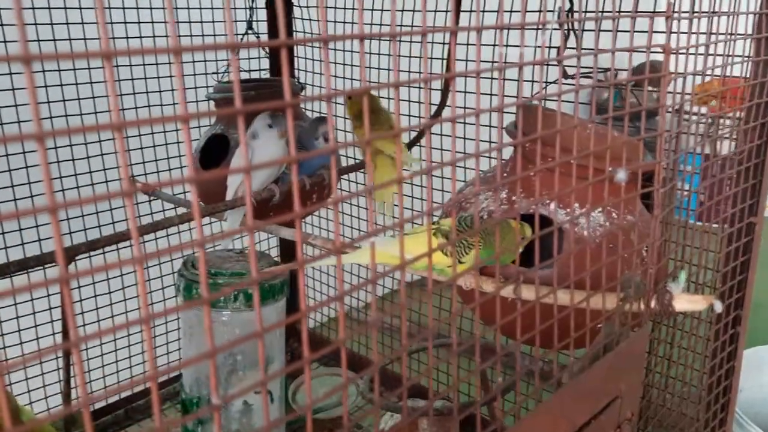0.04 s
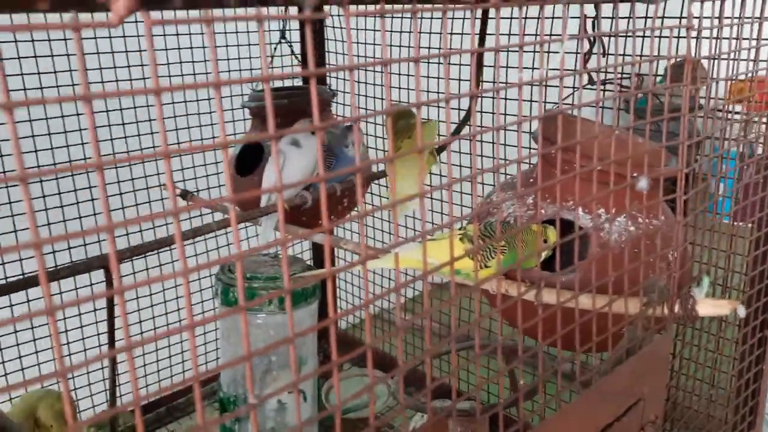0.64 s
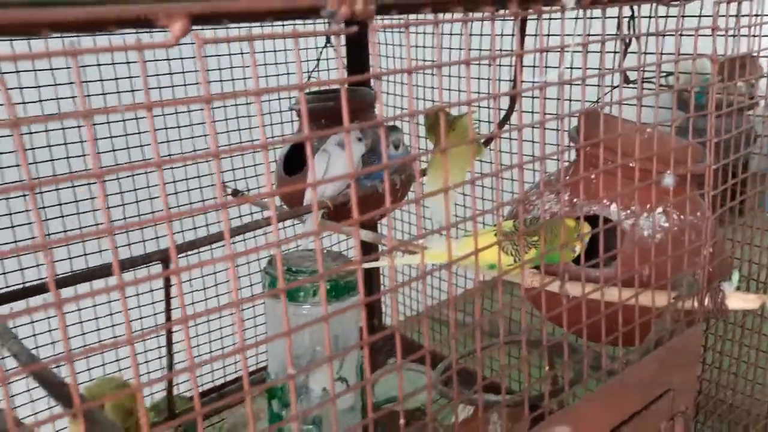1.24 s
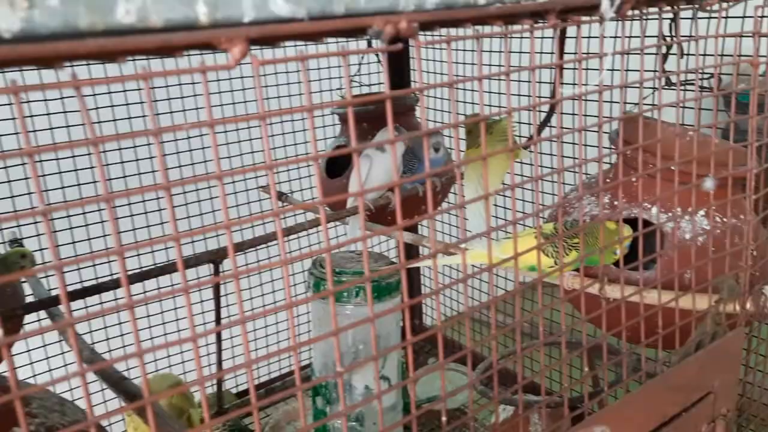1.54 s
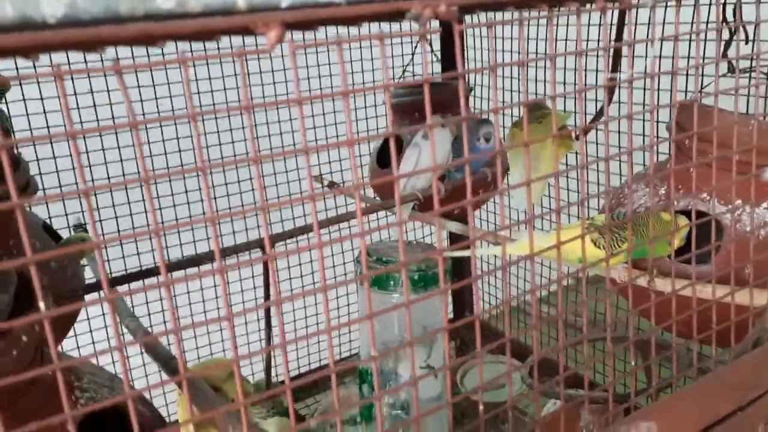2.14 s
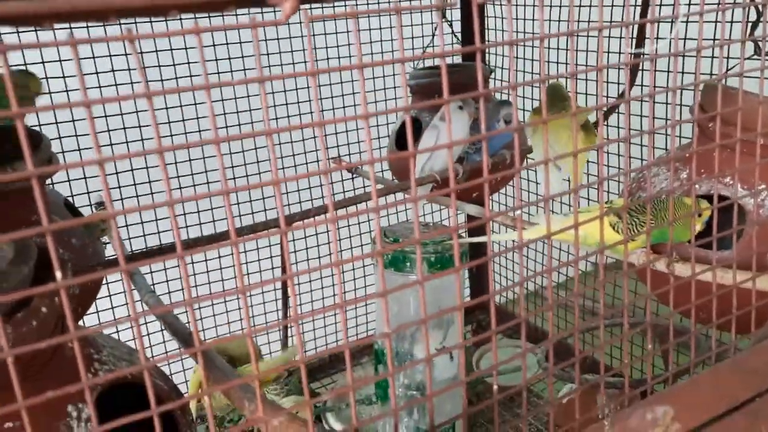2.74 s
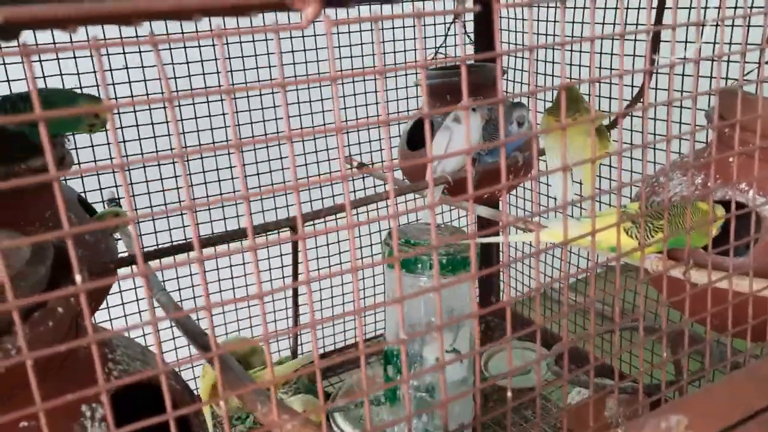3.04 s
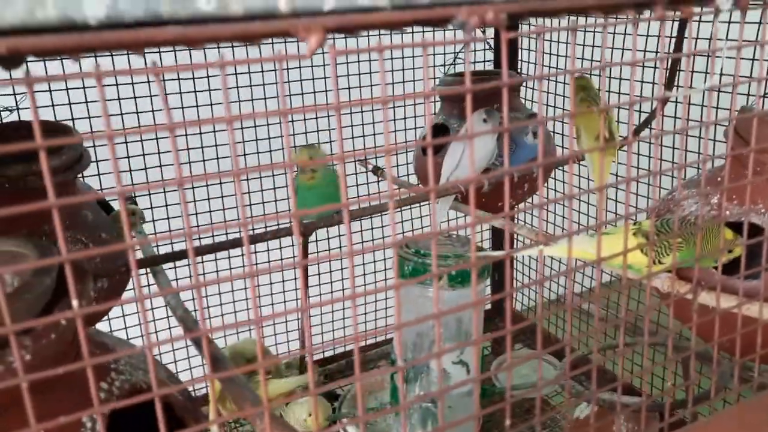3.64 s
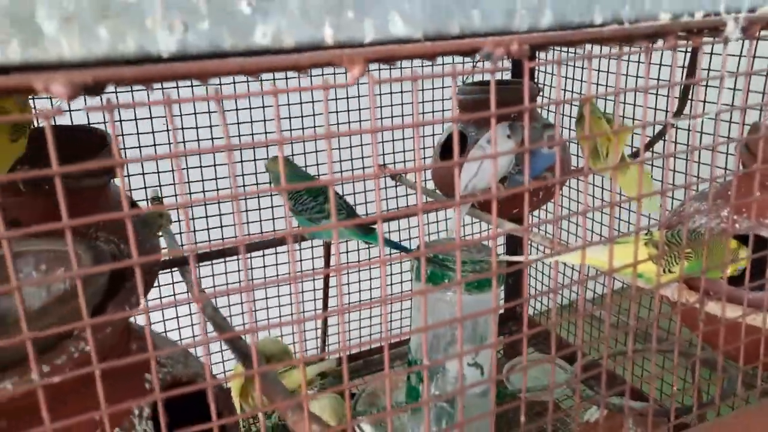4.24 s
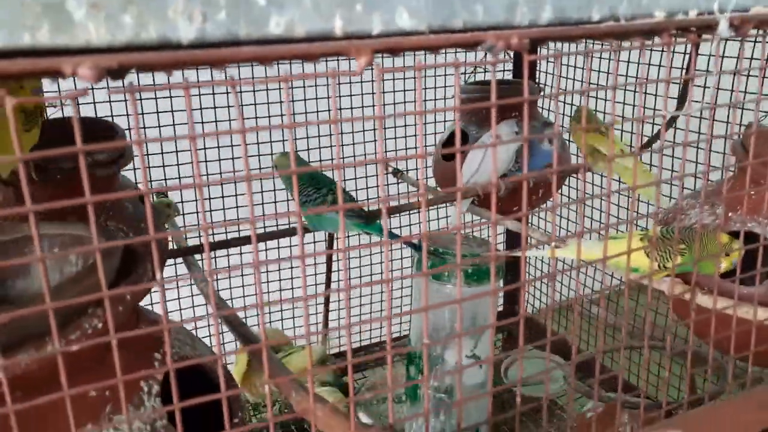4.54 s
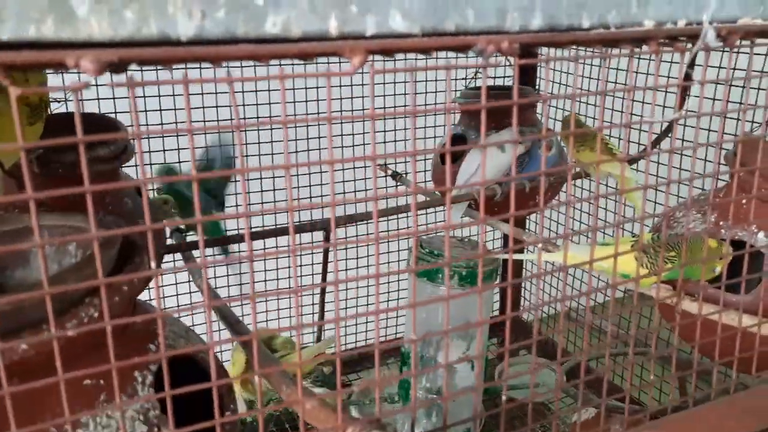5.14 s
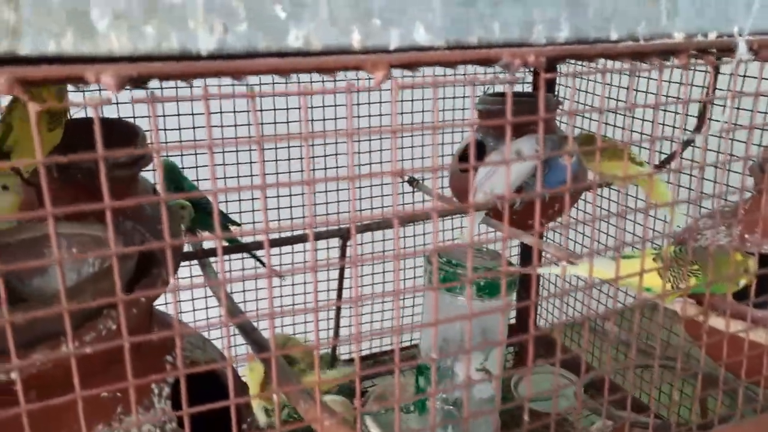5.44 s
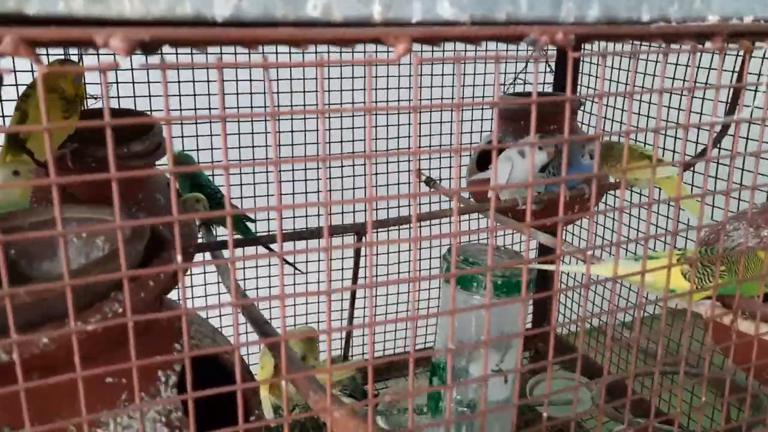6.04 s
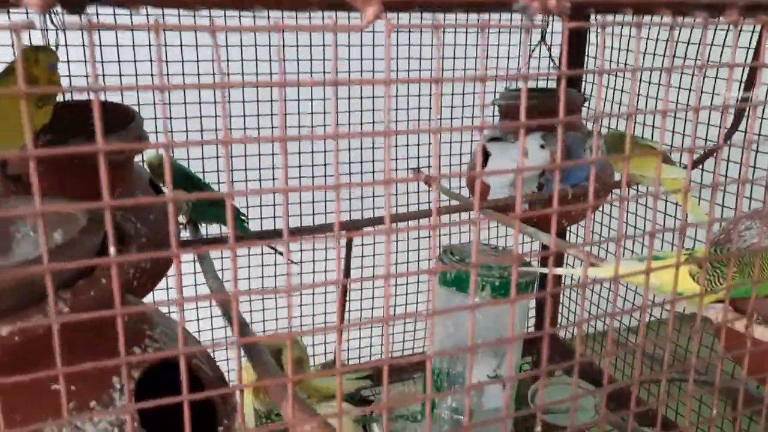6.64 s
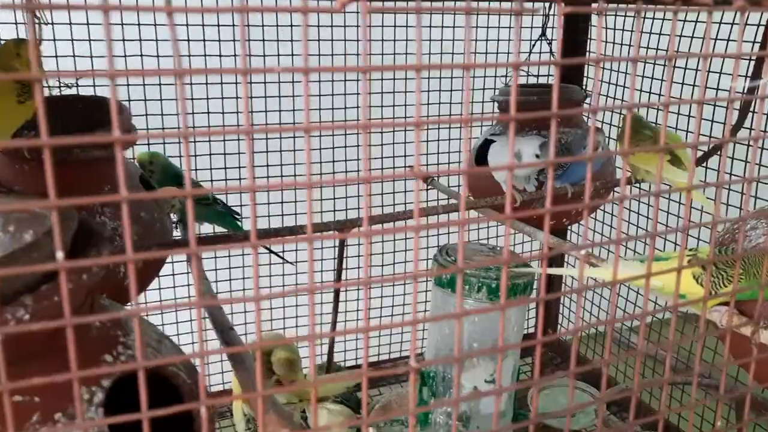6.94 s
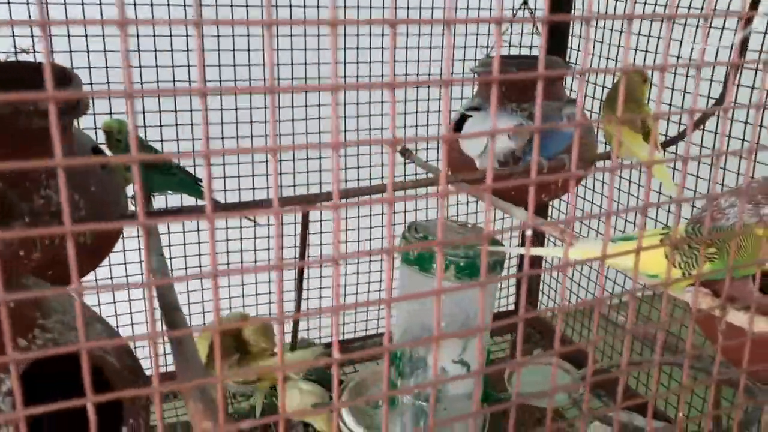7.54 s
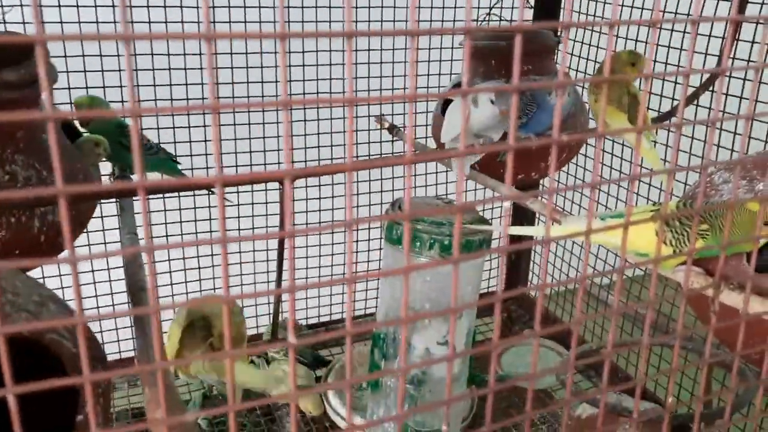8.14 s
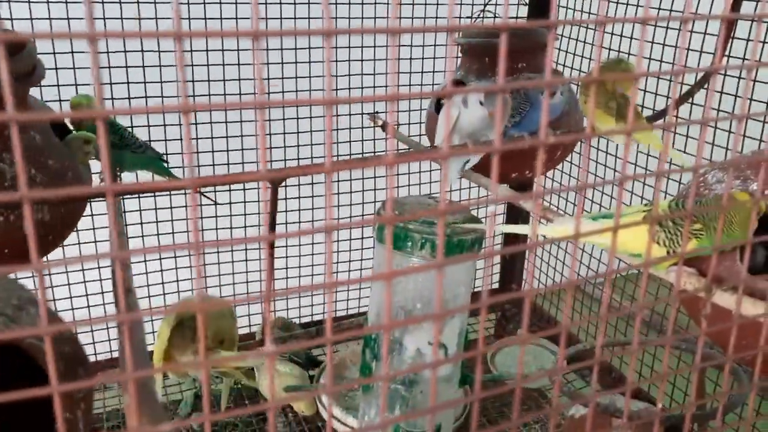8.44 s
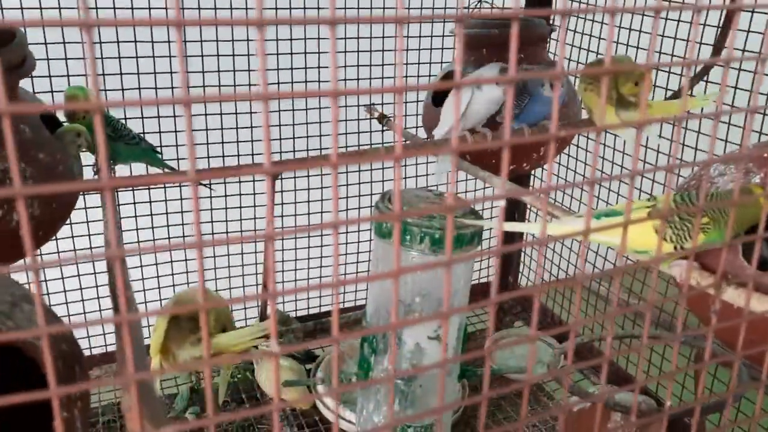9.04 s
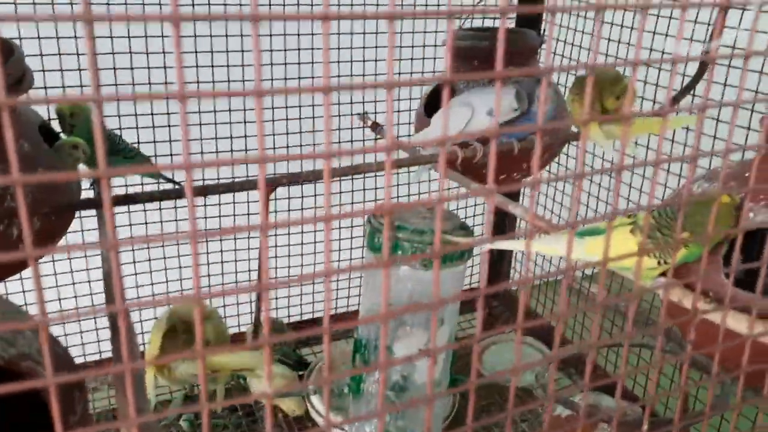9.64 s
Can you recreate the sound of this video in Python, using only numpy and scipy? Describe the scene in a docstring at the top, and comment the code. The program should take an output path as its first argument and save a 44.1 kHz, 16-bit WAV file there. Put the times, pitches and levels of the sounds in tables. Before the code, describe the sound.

Budgerigars chatter close to the microphone in a wire cage on a porch. Quick high chirps, some clear and some hoarse, mix with squawks and short buzzing rasps, while more birds twitter further back. Wings and claws rustle faintly twice, and the loudest rasp comes about three quarters of the way through. Distant traffic rumbles underneath the whole time.

```python
"""Budgerigars warble in a wire cage on a porch, close to a phone with two spaced microphones.
From the start, distant traffic rumbles and drones under quick syrinx glides, clear or hoarse, and the
chatter of birds further off. From 0.3 s buzzing rasps, puffs that ring the throat, join the glides.
Wings and claws rustle softly at 2.5 s and briefly at 7 s; the loudest rasp follows at 7.4 s.
The song runs to the end, thrown back by the cage floor and nearby walls."""
import sys
import numpy as np
from scipy import signal
from scipy.fft import rfft, irfft, next_fast_len
from scipy.io import wavfile

SR = 44100
rng = np.random.default_rng(int(sys.argv[2]) if len(sys.argv) > 2 else 0)


def wrap_up_sound(samples):
    """Save the sound to the file named by the first command line argument, as 16-bit audio."""
    columns = np.atleast_2d(samples).T
    # keep every value between -1 and 1, then stretch to whole-number steps
    tamed = np.clip(columns, -1, 1)
    steps = np.round(tamed * 32767).astype(np.int16)
    wavfile.write(sys.argv[1], SR, steps)


N = 431738
TIME = np.arange(N) / SR

# pan_db is left minus right throughout
# falling chirps; the 5180 Hz row is the bright overtone of the chirp at 4.06 s
# start_s, length_s, pitch_hz, level_db, hoarseness, pan_db
SLIDES = [(0.104, 0.029, 2590, -40, 0.2, -1), (0.215, 0.059, 3370, -39, 0.08, 2.5),
          (0.486, 0.038, 3050, -26, 0.17, -0.5), (0.517, 0.032, 1562, -33.5, 0.54, -6),
          (0.735, 0.041, 2013, -35, 0.38, -1.5), (0.97, 0.019, 3270, -48, 0, -23),
          (1.235, 0.03, 3074, -29, 0.4, -0.5), (1.371, .03, 2850, -26.5, 0.42, 1),
          (1.474, 0.026, 1996, -33.5, 0.4, 0), (1.426, 0.026, 3550, -29.5, 0.37, 0.5),
          (1.523, 0.026, 3590, -25, 0.35, -1.5), (1.543, .045, 2460, -27, 0.71, 1.5),
          (1.767, 0.032, 3630, -35, 0.3, 1.5), (1.864, 0.053, 1527, -37.5, 0.48, -1),
          (1.923, 0.047, 3360, -26, 0.58, 2), (2.143, 0.03, 2940, -31, 0.31, -1),
          (2.186, .029, 2140, -30, 0.43, 1.5), (2.488, 0.019, 3270, -27.5, 0.42, 5.5),
          (2.515, .049, 3097, -26.5, .65, 0.5), (2.907, 0.026, 3160, -26, 0, 2),
          (2.999, 0.018, 3690, -28.5, 0.3, 8), (3.008, .011, 6100, -19.5, 0.3, 0),
          (3.037, .043, 2293, -30, 0.1, 1), (3.177, 0.054, 2930, -25, 0.12, 2),
          (3.207, 0.041, 1550, -38.5, 0.15, 1.5), (3.321, 0.027, 5690, -28, .27, -8),
          (3.353, 0.045, 2410, -30, 0.59, 9), (3.42, 0.038, 2800, -18, 0.51, 1),
          (3.485, .023, 3280, -23.5, 0.24, -10), (3.698, 0.021, 3160, -27.5, 0.03, 0),
          (3.724, 0.037, 1750, -37, 0.65, -4.5), (3.96, .045, 1754, -36, 0.63, 1),
          (3.925, 0.03, 2700, -27.5, 0.4, 1), (4.053, .028, 5180, -36.5, 0.3, 0.5),
          (4.059, 0.03, 2650, -44, .25, 1.5), (4.309, 0.046, 3143, -29, 0.24, 0.5),
          (4.338, 0.04, 1680, -37.5, .7, -10), (4.456, 0.031, 3415, -29, 0.58, -1),
          (4.515, 0.037, 3120, -29, 0.33, 0.5), (4.614, 0.019, 3420, -29.5, 0.22, -8.5),
          (4.638, 0.052, 2220, -35.5, 0.42, 0.5), (4.833, 0.065, 3180, -34.5, 0.36, -6),
          (5.035, 0.043, 3090, -33, 0.42, 1), (5.165, 0.042, 5500, -26.5, 0.28, 2),
          (5.252, .043, 3320, -21.5, 0.46, 1), (5.355, 0.063, 2574, -40.5, 0.32, 1.5),
          (5.493, .024, 3630, -24.5, 0.42, -7), (5.839, 0.056, 2395, -41.5, 0, 4),
          (5.987, .028, 3413, -27, 0.27, -12), (6.391, 0.038, 2440, -32.5, 0.4, 2),
          (6.727, 0.044, 3066, -26, 0.47, 1), (6.756, 0.04, 2205, -31.5, 0.73, -13),
          (6.886, 0.016, 3490, -31, 0.1, 0), (7.345, 0.064, 3770, -31.5, 0.54, 7),
          (7.845, 0.067, 2805, -29.5, 0.52, 1), (8.006, 0.029, 3240, -41.5, 0.08, -16),
          (8.161, 0.084, 3150, -38.5, 0.36, -0.5), (8.23, .055, 2290, -30.5, .15, -2),
          (8.374, .025, 1860, -35, 0.42, -10), (8.461, 0.099, 2600, -35, 0.36, -0.5),
          (8.558, 0.046, 2500, -27.5, .2, -5.5), (8.866, 0.027, 3150, -24, 0.22, -8.5),
          (9.044, .008, 4075, -25.5, 0, 2.5), (9.081, 0.031, 3030, -24.5, 0.19, 1.5),
          (9.112, 0.031, 1643, -39, 0.67, -3), (9.237, 0.025, 3460, -36, 0.3, -0.5),
          (9.343, .055, 2878, -26.5, 0.38, 1.5), (9.553, .046, 3270, -25.5, 0.04, -0.5),
          (9.689, 0.026, 3530, -22, 0, -10.5), (9.717, 0.071, 2370, -28, 0.17, -1)]
# hoarse, nearly level notes: start_s, length_s, pitch_hz, level_db, pan_db
SQUAWKS = [(0.006, 0.053, 2480, -32, 2), (1.449, 0.06, 3017, -28, 1), (1.634, 0.064, 1850, -33, 1),
           (1.961, 0.041, 1887, -34, -2), (2.082, 0.054, 2716, -34, 1.5), (2.538, 0.051, 2213, -29.5, -3),
           (2.855, 0.043, 1790, -32.5, 0.5), (3.151, 0.035, 2380, -26, 2), (3.457, .039, 2600, -28, 2),
           (3.515, 0.051, 2106, -32, -9), (3.856, 0.046, 3980, -32, 2), (4.242, 0.038, 3950, -26, 2.5),
           (4.273, .029, 2120, -26.5, -4.5), (5.197, 0.054, 3180, -26, 1), (5.281, .066, 2806, -29, -7),
           (5.601, 0.063, 2770, -40, -1.5), (6.088, 0.035, 3385, -34.5, 3.5),
           (6.405, 0.073, 2010, -31, -3.5), (6.687, 0.044, 2780, -26.5, -1.5),
           (7.895, 0.023, 2350, -39, -21), (8.884, 0.0513, 3110, -33.5, -0.5),
           (9.386, 0.062, 2330, -31.5, 0.5)]
# upward leaps that level off: start_s, length_s, pitch_hz, level_db, pan_db
FLICKS = [(0.44, .032, 5100, -36, 3), (1.177, 0.024, 3254, -29.5, 2), (1.307, 0.016, 4370, -29, 2.5),
          (1.341, 0.062, 2890, -28, 1.5), (1.59, 0.043, 2830, -31, 1), (1.855, .04, 4890, -31, 7),
          (2.137, 0.026, 1940, -26, -5), (2.369, 0.013, 4160, -29.5, 9), (2.437, 0.043, 5100, -36, 8),
          (3.117, 0.021, 3020, -25.5, -2.5), (3.39, 0.024, 2796, -18.5, -1.5),
          (3.619, 0.011, 4900, -24.5, -7), (3.625, 0.03, 3020, -28, 3), (3.764, .009, 3360, -27, 1),
          (4.447, .025, 5050, -30.5, -0.5), (5.758, 0.04, 3265, -34.5, 1.5),
          (5.935, 0.077, 1984, -35.5, -0.5), (6.851, 0.0076, 3920, -26, -7), (7.833, 0.031, 2006, -34, 1),
          (8.328, .045, 2860, -33, -5), (8.656, 0.034, 4650, -25.5, 0.5), (9.063, 0.038, 3190, -32, 7)]
# first and last pitch, semitones from the middle pitch
SQUAWK_ST, FLICK_ST, TAIL_ST = (0.82, -1.38), (-5, -0.59), (3.45, -4.0)
SLIDE_KNEE_HZ = 2491


def undb(db):
    return 10 ** (np.asarray(db) / 20)


def unit(x):
    return x / np.sqrt(np.mean(x ** 2) + 1e-18)


def on_log(hz, points):
    """Interpolate (hz, value) points over log frequency."""
    f, value = np.transpose(points)
    return np.interp(np.log(np.maximum(hz, 1)), np.log(f), value)


def shaped(x, gain):
    """Filter by gain(hz)."""
    size = next_fast_len(len(x) + 256)
    return irfft(rfft(x, size) * gain(np.fft.rfftfreq(size, 1 / SR)), size)[:len(x)]


def peak(f, centre_hz, width_hz):
    return 1 / (1 + ((f - centre_hz) / (width_hz / 2)) ** 2)


def resonant(x, modes):
    """Resonances (centre_hz, width_hz, gain_db) with a bass cut; unit RMS."""
    def gain(f):
        peaks = sum(undb(db) * peak(f, hz, width_hz) for hz, width_hz, db in modes)
        return peaks * f ** 4 / (f ** 4 + 1400. ** 4)
    return unit(shaped(x, gain))


def waver(size, rate_hz):
    """Smooth random curve, spread near 1."""
    at = np.arange(size) * rate_hz / SR + rng.random()
    points = rng.standard_normal(int(at[-1]) + 2)
    k = at.astype(int)
    return points[k] + (points[k + 1] - points[k]) * np.sin((at - k) * np.pi / 2) ** 2


def phase_of(hz):
    return 2 * np.pi * np.cumsum(hz) / SR


def place(out, sound, start_s, pan_db, lag_ms, echo_db=-10, farthest_s=.014, echoes=5):
    """Direct path to each microphone, left later by lag_ms, plus floor and wall reflections."""
    for channel, side in enumerate((1, -1)):
        delays_s = np.r_[0, rng.uniform(.001, farthest_s, echoes)] + side * lag_ms / 2000
        gains = np.r_[undb(side * pan_db / 2), undb(echo_db) * rng.standard_normal(echoes)]
        for delay_s, gain in zip(delays_s, gains):
            i = int(np.clip((start_s + delay_s) * SR, 0, N))
            out[channel, i:i + len(sound)] += gain * sound[:N - i]


def diffuse(spectrum, alike_hz=620):
    """Noise from all around: alike at both microphones in the bass, unrelated in the treble."""
    def noise(sign):
        weight = lambda f: np.sqrt(1 + sign * .985 / (1 + (f / alike_hz) ** 2))
        return shaped(rng.standard_normal(N), lambda f: undb(on_log(f, spectrum)) * weight(f))
    mid, side = noise(1), noise(-1)
    return np.array([mid + side, mid - side]) / np.std(mid)


def traffic(rumble_db=1.5, body_db=-0.5, tyre_db=-9, air_db=-62, pan_db=-2.0, split_hz=105):
    """Distant engines rumble, drone and swell as vehicles pass, under a thin steady hiss."""
    # passing vehicles: time_s, low_db, engine_db
    swells = [(0.0, -48.5, -42.5), (1.14, -60, -48), (1.61, -55.5, -47), (3.05, -57, -41),
              (4.01, -51.5, -44.5), (4.31, -59, -48), (5.78, -54.5, -46.5), (6.32, -48, -46),
              (7.2, -58, -46), (7.96, -61, -50), (9.08, -51, -48.5), (9.79, -55.5, -48)]
    # noise spectra: frequency_hz, density_db
    rumble_spectrum = [(15, -46), (25, -36), (59, -11.5), (92, -13), (120, -3), (183, -1), (217, -4.5),
                       (253, -4.5), (319, -3.5), (550, -16), (720, -28.5), (1210, -120)]
    tyre_spectrum = [(250, -30), (450, -24), (700, 2.5), (1100, 0.5), (2000, -5.5), (5000, -16)]
    air_spectrum = [(400, -20), (1500, 0), (3000, 0), (6000, -8), (10000, -14), (16000, -20)]
    # engine tones: start_s, end_s, pitch_hz, level_db
    drones = [(0, 14, 71.05, -53.5), (0, 5.4, 121.9, -51.5), (0, 2.7, 346.3, -55.5),
              (2.202, 3.82, 313.3, -49), (2.2, 7.2, 259.8, -52), (8.702, 9.8, 338.3, -55)]
    time_s, *levels_db = np.transpose(swells)
    low_db, engine_db = (np.interp(TIME, time_s, db) for db in levels_db)
    noise = diffuse(rumble_spectrum)
    low = np.array([shaped(channel, lambda f: 1 / (1 + (f / split_hz) ** 12)) for channel in noise])
    body = undb(body_db) * unit(noise - low)
    tyres = undb(tyre_db) * diffuse(tyre_spectrum)
    street = undb(low_db + rumble_db) * unit(low) + undb(engine_db) * (body + tyres)
    for start_s, end_s, hz, db in drones:
        i, j = np.clip([int(start_s * SR), int(end_s * SR)], 0, N)
        tone = np.sin(phase_of(hz + 3 * waver(j - i, 12))) * undb(2.5 * waver(j - i, 5))
        street[:, i:j] += undb(db) * unit(tone * signal.windows.tukey(j - i, .2))
    return street * undb(np.array([[pan_db], [-pan_db]]) / 2) + undb(air_db) * diffuse(air_spectrum)


def syrinx(length_s, pitches_hz, overtone_db, hoarse, flutter_hz=800, buzz_hz=420,
           tremble_db=3.5, arch_db=2, cutoff_hz=950.):
    """One glide through three pitches; when hoarse, the membrane flutters and adds sidebands."""
    size = max(int(length_s * SR), 64)
    u = np.linspace(0, 1, size)
    glide_hz = np.exp(np.polyval(np.polyfit([0, .5, 1], np.log(pitches_hz), 2), u))
    drift = .018 * waver(size, 160)
    flutter = (.02 + .1905 * hoarse ** 1.3) * waver(size, flutter_hz)
    hz = glide_hz * np.exp(drift + flutter)
    phase = phase_of(hz)
    # a slower, uneven vibration chops the tone
    buzz = np.cos(phase_of(buzz_hz * np.exp(0.276 * waver(size, 61.6))))
    envelope = signal.windows.tukey(size, .1) * (1 + hoarse * buzz)
    envelope *= undb(tremble_db * waver(size, 178.5) + arch_db * np.sin(np.pi * u))
    overtones = np.sin(2 * phase)
    for k, db in ((3, -9), (4, -17), (5, -25)):
        overtones += undb(db) * np.sin(k * phase) * (k * hz < SR / 2)
    tone = unit(envelope) * (np.sin(phase) + undb(overtone_db + 5 * waver(size, 140)) * overtones)
    # so small a throat radiates no bass
    return shaped(tone, lambda f: f ** 6 / (f ** 6 + cutoff_hz ** 6))


def syllable(length_s, pitch_hz, ends_st, hoarse, throat_hz=2780, onset_db=-5, puff_db=5):
    """A swelling syrinx note; air hisses through the open beak, more so when hoarse."""
    # beak resonances: centre_hz, width_hz, gain_db
    beak_modes = [(4240, 580, -2.5), (6600, 1100, -10), (8150, 2900, 6.5), (13200, 4000, -9.5)]
    # the throat favours one region, so low notes have stronger overtones
    overtone_db = -20 - 14.5 * np.log2(pitch_hz / throat_hz)
    overtone_db += 3 * np.log2(.05 / max(length_s, .015))  # short notes are brighter
    pitches_hz = pitch_hz * 2 ** (np.array([ends_st[0], 0, ends_st[1]]) / 12)
    tone = syrinx(length_s, pitches_hz, overtone_db, .857 * hoarse)
    size = len(tone)
    swell = undb(np.interp(np.linspace(0, 1, size), [0, .32], [onset_db, 0]))
    air = rng.standard_normal(size) * np.hanning(size) * undb(puff_db * waver(size, 267))
    return swell * tone + undb(-34 + 8.5 * hoarse) * resonant(air, beak_modes)


def slide_ends_st(pitch_hz, fall_hz=1195.5):
    """Above the knee a slide drops, then levels off; below it, it hangs, then drops."""
    early_share = np.clip(.5 + .444 * np.log2(pitch_hz / SLIDE_KNEE_HZ), .4, .75)
    ratios = 1 + fall_hz / pitch_hz * np.array([early_share, early_share - 1])
    return 12 * np.log2(np.clip(ratios, .7, 1.5))


def warble(lag_ms_per_db=0.06, tail_s=.045, tail_shift_st=-7, tail_db=-15.5):
    """Near birds' song; a bird on the left reaches the left microphone louder and sooner."""
    # rising notes: start_s, length_s, pitch_hz, level_db, pan_db
    upslurs = [(0.445, 0.056, 2530, -34.5, -1), (0.684, .042, 1590, -38.5, 1.5),
               (3.652, .049, 2120, -36, 1), (4.489, 0.02, 1906, -34, -9), (5.097, 0.061, 2546, -34, 1.5),
               (6.339, 0.088, 2397, -36, 4), (6.51, 0.055, 2130, -29.5, 1),
               (9.305, 0.047, 2083, -29.5, 0.5), (9.51, 0.043, 2470, -26.5, -1.5)]
    # low whistles that dip and rise: start_s, length_s, pitch_hz, level_db, pan_db
    scoops = [(0.014, 0.053, 1257, -36, -3.5), (2.324, 0.064, 1440, -36.5, 1),
              (3.896, 0.038, 1925, -29.5, 2), (4.674, 0.052, 1120, -40.5, -2),
              (6.189, 0.15, 1353, -38.5, -3), (6.798, 0.073, 1620, -35, -3),
              (6.95, 0.15, 1022, -37.5, -5.5), (7.235, 0.16, 1082, -42, -1.5),
              (7.572, .096, 1620, -33.5, 2.5), (7.74, .07, 1240, -37.5, -7),
              (8.299, 0.032, 1796, -39, -13.5), (8.524, 0.02, 1745, -28.5, -9),
              (8.603, 0.07, 1737, -32.5, -10), (8.8, 0.11, 1670, -39.5, -3)]
    # notes, ends_st, hoarseness
    kinds = ((SQUAWKS, SQUAWK_ST, .844), (FLICKS, FLICK_ST, .33),
             (upslurs, (-4.0, 6.13), .25), (scoops, (2.2, 4.14), .1))
    calls = []
    for start_s, length_s, hz, db, hoarse, pan_db in SLIDES:
        calls.append((start_s, db, pan_db, syllable(length_s, hz, slide_ends_st(hz), hoarse)))
        # only high slides trail off in a tail
        tail = syllable(tail_s, hz * 2 ** (tail_shift_st / 12), TAIL_ST, hoarse=.38)
        calls.append((start_s + length_s, db + tail_db, pan_db, tail * (hz > SLIDE_KNEE_HZ)))
    for notes, ends_st, hoarse in kinds:
        for start_s, length_s, hz, db, pan_db in notes:
            calls.append((start_s, db, pan_db, syllable(length_s, hz, ends_st, hoarse)))
    out = np.zeros((2, N))
    for start_s, db, pan_db, call in calls:
        lag_ms = np.clip(-lag_ms_per_db * pan_db, -.5, .2)
        place(out, undb(db) * call, start_s, pan_db, lag_ms, echo_db=-13)
    return out


def far_flock(level_db=-47.0, spread_db=6, stirred_db=7, stirred_s=0.15, count=260,
              pitch_hz=1900, range_octaves=1.3):
    """Birds further back: short syllables, mostly falling, louder while the near birds call."""
    contours_st = 4 * [TAIL_ST] + 2 * [SQUAWK_ST] + [FLICK_ST]
    near_ends_s = np.array([row[0] + row[1] for row in SLIDES + SQUAWKS + FLICKS])
    out = np.zeros((2, N))
    for k, (jitter, side, nearness) in enumerate(rng.random((count, 3))):
        start_s = (k + jitter) / count * TIME[-1]
        stirred = np.tanh(np.sum(np.exp(-((start_s - near_ends_s) / stirred_s) ** 2)) / 2)
        db = level_db + spread_db * (nearness - .5) + stirred_db * (stirred - .5)
        length, hoarse, height, kind = rng.random(4)
        hz = pitch_hz * 2 ** (range_octaves * (height - .5))
        call = syllable(.018 + .04 * length, hz, contours_st[int(kind * len(contours_st))], .794 * hoarse)
        place(out, undb(db) * call, start_s, pan_db=0, lag_ms=side - .5, echo_db=-7)
    return out


def rasps(pulse_hz=180, ring_hz=5850):
    """Harsh calls: puffs at the pulse rate ring the throat, swell and break off."""
    # rasps and sharp ticks: start_s, end_s, level_db, hiss_db, pan_db
    calls = [(0.311, 0.362, -30.5, -5, -4.5), (0.433, 0.46, -32, -10, -1), (1.118, 1.133, -34, -15.5, 7.5),
             (1.228, 1.258, -33, -21, 3), (1.857, 1.9, -36.5, -16, -5), (1.943, 1.96, -33.5, -12, -8.5),
             (2.072, 2.09, -38.5, -29, -3), (2.295, 2.309, -32.5, -14, 3), (2.365, 2.387, -35, -11.5, -8),
             (2.772, 2.8, -36, -14, -12), (2.865, 2.891, -36, -16, -7), (2.989, 3.052, -25, -9, -0.5),
             (3.325, 3.355, -33, -4, -1), (3.4, 3.463, -43, -12, -30), (3.539, 3.58, -35, -15, 5),
             (3.765, 3.78, -34.5, -7, -2), (4.055, 4.064, -31, -9.5, 3), (4.243, 4.28, -45, -11, -21),
             (5.202, 5.214, -32, -5.5, -2), (5.554, 5.577, -40.5, -19, 10),
             (6.654, 6.712, -42.5, -15.5, 14), (6.991, 6.995, -35.5, -24, 5), (7.01, 7.037, -38, -22, 12),
             (7.389, 7.413, -18, -6.5, 0), (7.606, 7.651, -42, -13, -8), (7.689, 7.728, -39.5, -12, -7),
             (7.873, 7.892, -39, -11, -9), (8.452, 8.493, -25.5, -5, 0), (8.773, 8.784, -33, -15.5, -3),
             (8.882, 8.955, -39.5, -17, 0), (9.085, 9.117, -49, -1, -4), (9.483, 9.507, -38, -18, -15)]
    # throat and open-beak resonances, low to high: centre_hz, width_hz, gain_db
    body_modes = [(2780, 2700, 15.5), (4190, 1100, 21.5), (6260, 2300, 0)]
    top_modes = [(8870, 2100, 11), (11200, 4100, -7), (15000, 1900, -31)]
    air_modes = [(14000, 6300, 0)]
    out = np.zeros((2, N))
    for start_s, end_s, db, hiss_db, pan_db in calls:
        lead_s = .35 * (end_s - start_s)
        size = max(int((end_s - start_s + lead_s) * SR), 128)
        cycle = phase_of(pulse_hz * (1 + .12 * waver(size, 150)))
        swell = np.interp(np.linspace(0, 1, size), [0, .24, .32, .8, .95, 1], [0, .06, .35, 1, .6, 0])
        puffs = unit(swell * np.exp(np.cos(cycle) / 2 + 0.45 * waver(size, 225)))
        body = resonant(puffs * rng.standard_normal(size), body_modes)
        top = undb(hiss_db - 1) * resonant(puffs * rng.standard_normal(size), top_modes)
        # the wider the beak, the higher the hiss reaches
        air = undb(2 * hiss_db - 3) * resonant(swell * rng.standard_normal(size), air_modes)
        # the harder the call, the more the upper resonance sings
        ring = puffs * np.sin(phase_of(ring_hz + 300 * waver(size, 700))) * undb(.6 * (db + 22))
        rasp = unit(body + ring) + top + air
        place(out, undb(db) * rasp, start_s - lead_s, pan_db, lag_ms=.15, echo_db=-13.5)
    return out


def scuffle(centre_hz=760, width_hz=500):
    """Birds shift and flutter: a soft rustle in strokes that swells and fades."""
    # wings and claws: start_s, length_s, level_db, stroke_rate_hz
    flurries = [(2.501, 0.99, -56, 24), (6.97, .1, -48, 84)]
    out = np.zeros((2, N))
    for start_s, length_s, db, rate_hz in flurries:
        t = TIME[:int(length_s * SR)]
        strokes = rng.standard_normal(len(t)) * np.exp(-2 * (t * rate_hz % 1)) * np.hanning(len(t))
        rustle = shaped(strokes, lambda f: peak(f, centre_hz, width_hz))
        place(out, undb(db) * unit(rustle), start_s, pan_db=0, lag_ms=0)
    return out


def porch(dry, wet_db=-7.5, build_s=0.014):
    """Diffuse reverberation, different at each microphone, longest near 3 kHz."""
    # decay per band: centre_hz, t60_s
    bands = [(800, 0.11), (3000, 0.36), (6000, 0.28), (14000, 0.24)]
    t = TIME[:SR // 2]
    log_centres = np.log(np.array(bands)[:, 0])
    wet = []
    for channel in dry:
        noise, tail = rng.standard_normal(len(t)), 0
        for share, (_, t60_s) in zip(np.eye(len(bands)), bands):
            band = shaped(noise, lambda f: np.interp(np.log(f + 1), log_centres, share))
            tail += band * undb(-60 * t / t60_s)
        tail *= 1 - np.exp(-(t / build_s) ** 2)
        wet.append(signal.fftconvolve(channel, tail / np.linalg.norm(tail))[:N])
    return undb(wet_db) * np.array(wet)


def scene():
    birds = warble() + rasps() + far_flock() + scuffle()
    return birds + porch(birds) + traffic()


def record(dry, left_bright_db=5, top_hz=15900):
    """The left microphone is brighter than the right; the phone cuts the top."""
    treble_db = lambda f: left_bright_db / 2 * np.clip((f - 6000) / 2500, 0, 1)
    left = shaped(dry[0], lambda f: undb(treble_db(f)))
    right = shaped(dry[1], lambda f: undb(-treble_db(f)))
    return signal.sosfilt(signal.ellip(10, .2, 70, top_hz, fs=SR, output="sos"), [left, right])


dry = scene()
out = record(dry)
wrap_up_sound(out)
```